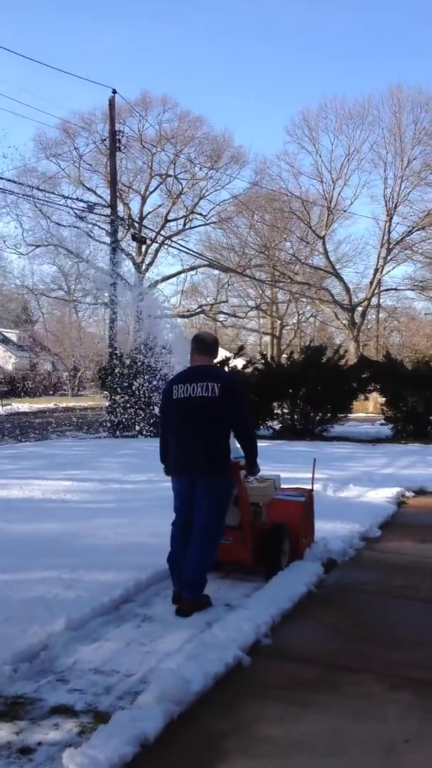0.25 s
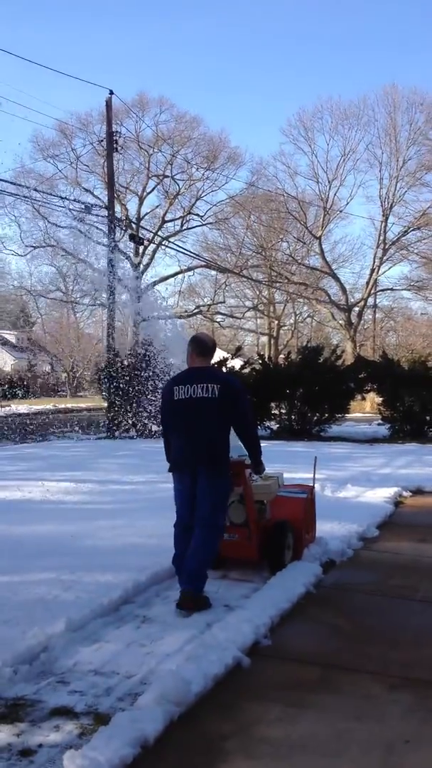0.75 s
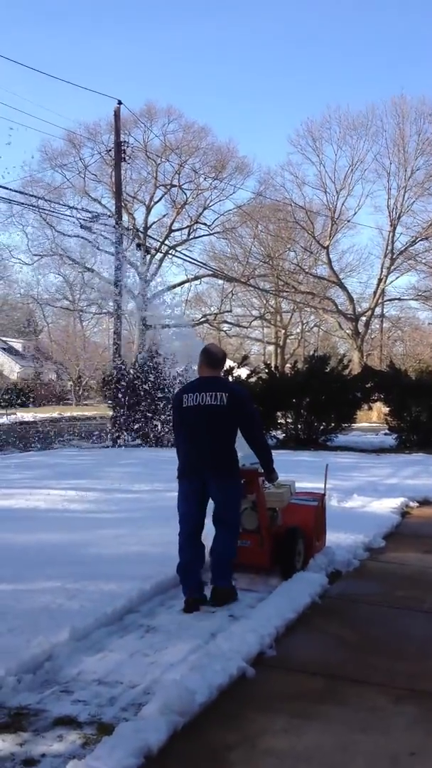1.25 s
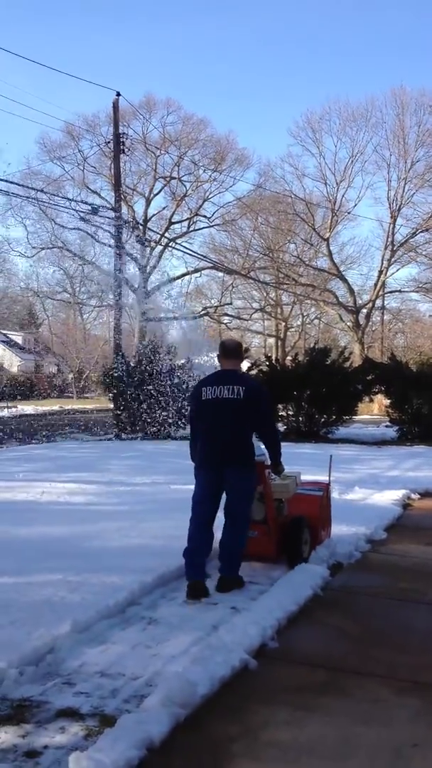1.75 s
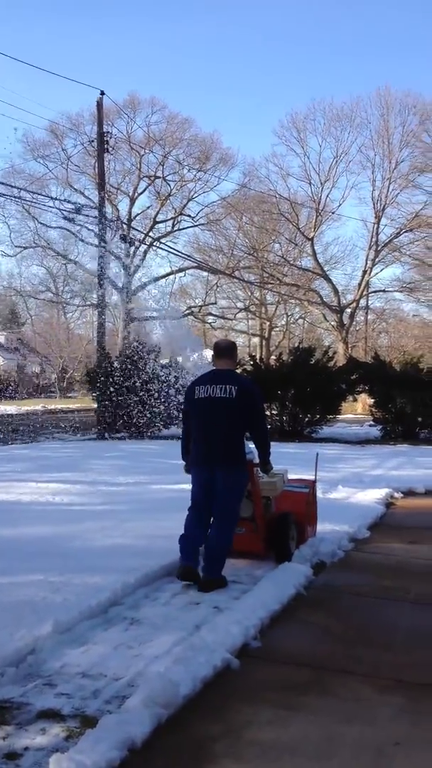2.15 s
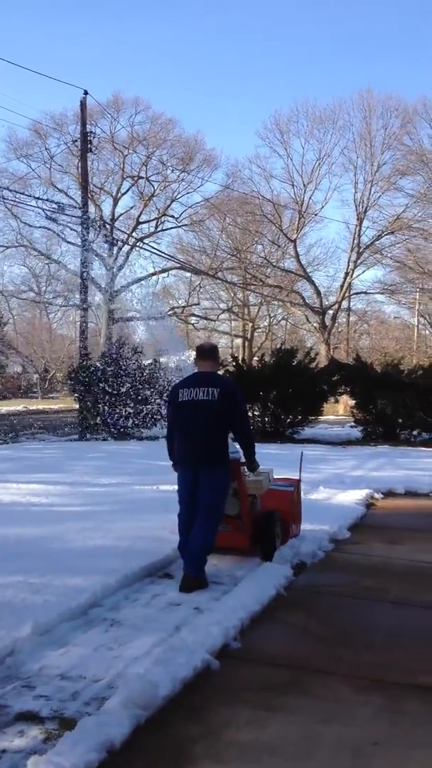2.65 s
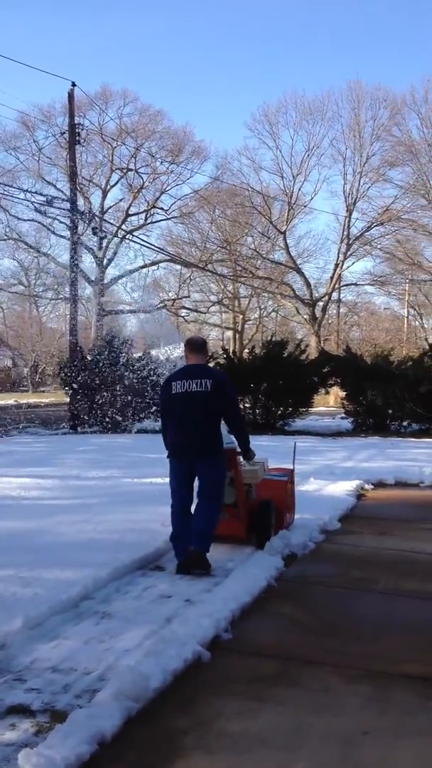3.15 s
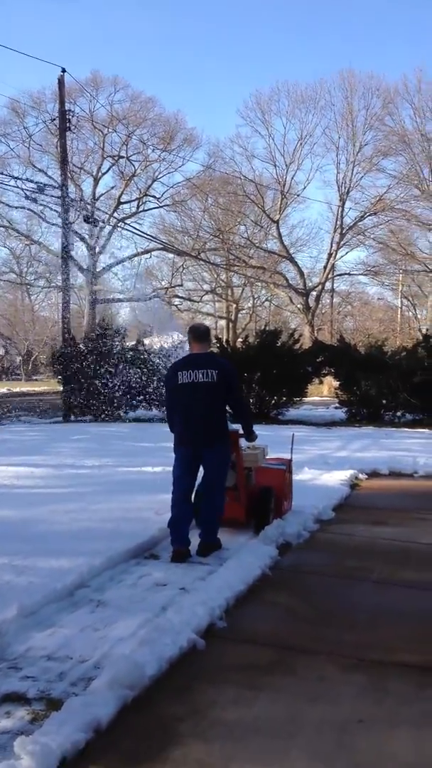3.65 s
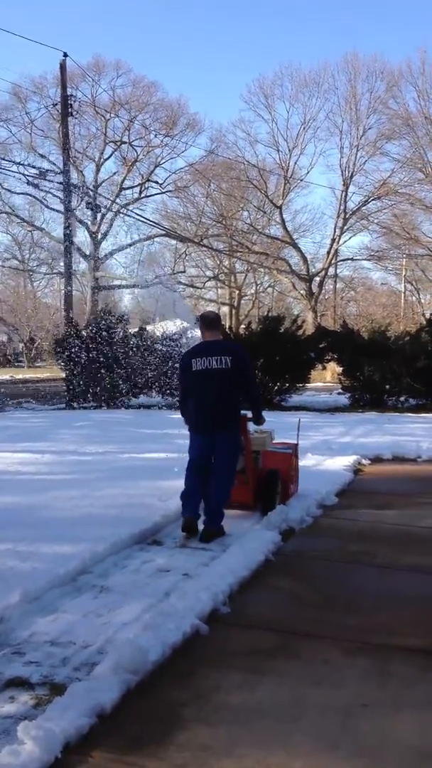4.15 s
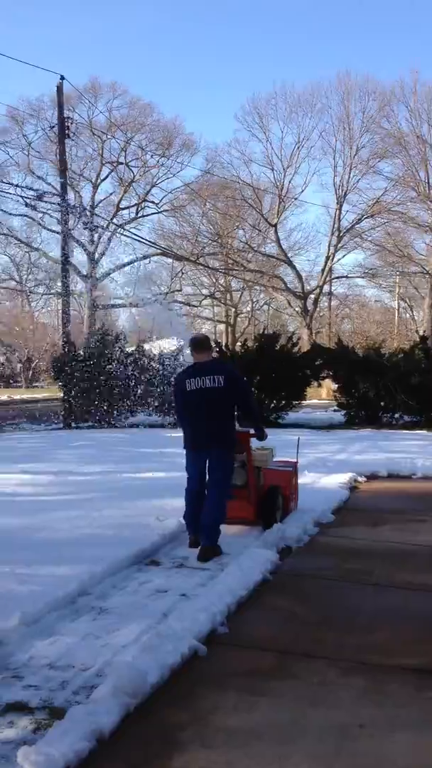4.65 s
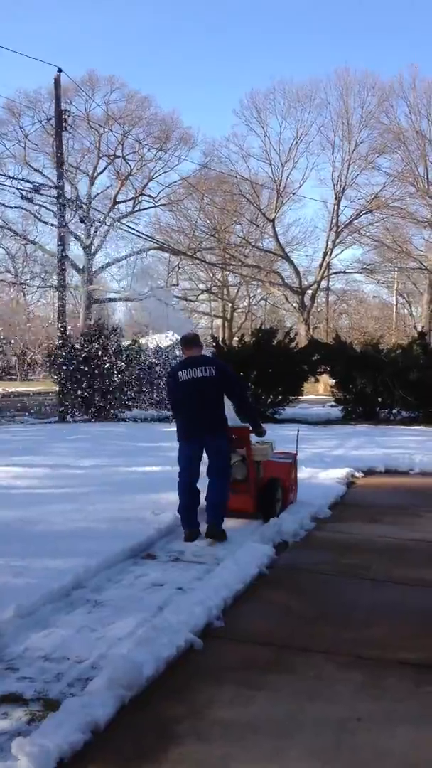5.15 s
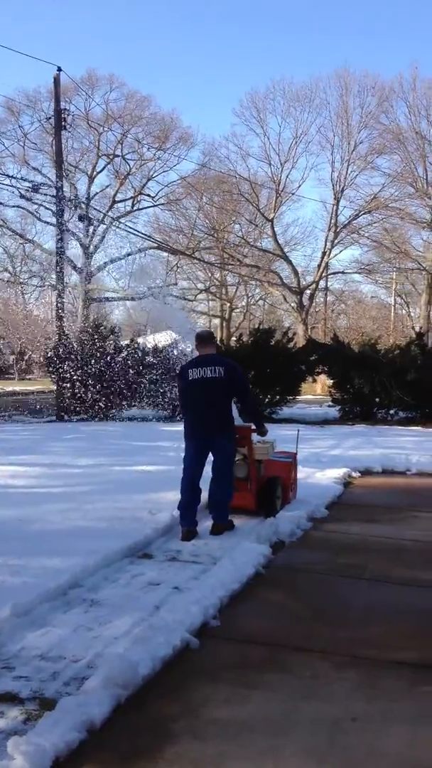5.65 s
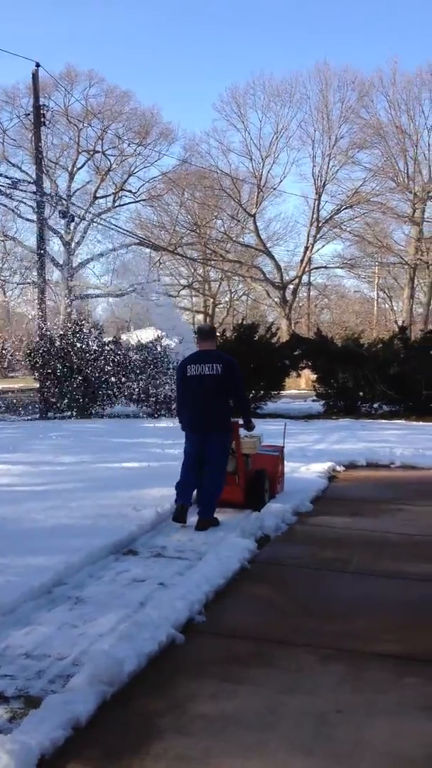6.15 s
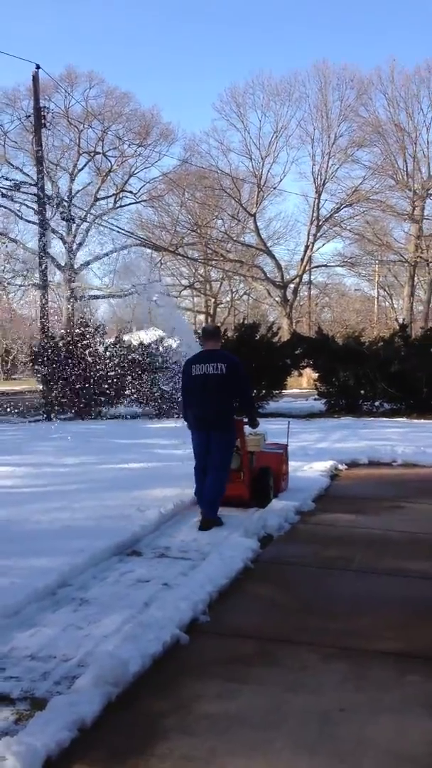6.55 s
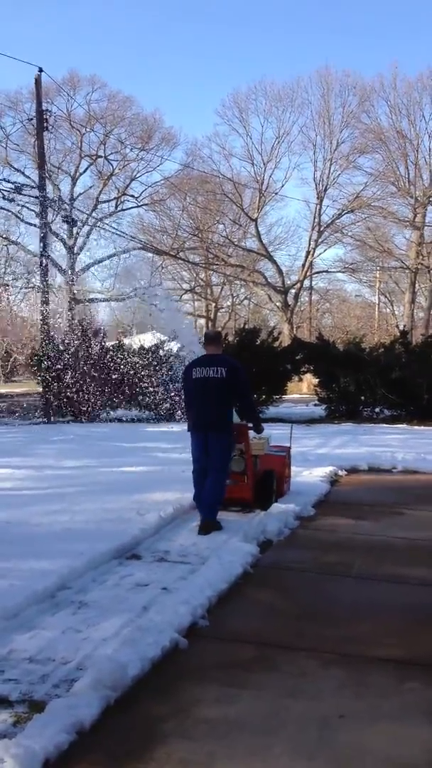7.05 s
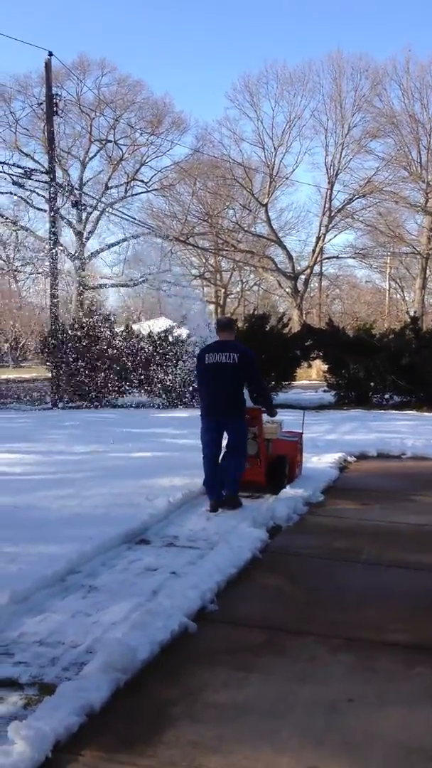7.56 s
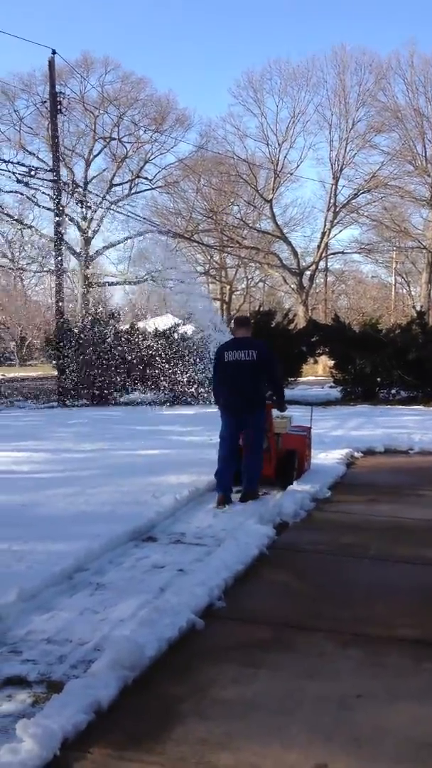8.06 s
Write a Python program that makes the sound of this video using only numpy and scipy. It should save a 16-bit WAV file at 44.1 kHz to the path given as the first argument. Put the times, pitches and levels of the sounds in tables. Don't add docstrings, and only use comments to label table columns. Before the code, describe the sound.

A small single-cylinder snow thrower engine chugs steadily outdoors, clattering and hissing with thrown snow, slowly growing fainter and duller as it moves away.

```python
import sys
import numpy as np
from scipy import signal
from scipy.fft import rfft, irfft
from scipy.io import wavfile
from scipy.ndimage import uniform_filter1d

SR = 44100
rng = np.random.default_rng(int(sys.argv[2]) if len(sys.argv) > 2 else 0)


def transcribe(u):
    v = np.clip(np.atleast_2d(u).T, -1, 1)
    q = np.round(v * 32767).astype(np.int16)
    wavfile.write(sys.argv[1], SR, q)


def makeup_ratio(level_db):
    decades = np.asarray(level_db, float) / 20
    return 10 ** decades


N = 366912
T = np.arange(N) / SR

# [t/s, engine cycles per s]
SPEED = [(0.0, 25.564), (0.34, 24.657), (1.18, 25.161), (1.39, 25.803), (1.55, 25.369), (2.17, 24.814),
         (2.76, 25.9), (3.31, 24.876), (3.78, 25.576), (3.95, 25.128), (4.24, 25.667), (4.93, 24.644),
         (5.51, 25.54), (5.93, 25.048), (6.9, 25.116), (7.11, 25.564), (7.57, 24.91), (8.32, 25.201)]


def evened(x):
    return x / np.sqrt(np.mean(x ** 2) + 1e-20)


def curve(rows, column=1):
    return np.interp(T, [row[0] for row in rows], [row[column] for row in rows])


def read(points, hz):
    f, value = np.transpose(points)
    return np.interp(np.log(hz + 1), np.log(f + 1), value)


def beats(place, spread_db, jitter_ms):
    start_cycle = -.116
    cycles = start_cycle + np.cumsum(curve(SPEED)) / SR
    at = np.flatnonzero(np.diff(np.floor(cycles - place)) > 0)
    chance = rng.standard_normal((len(at), 2))
    late = (chance[:, 0] * jitter_ms * SR / 1000).astype(int)
    clicks = np.zeros(N)
    clicks[np.clip(at + late, 0, N - 1)] = makeup_ratio(spread_db * chance[:, 1])
    return clicks


def noise(gain_db, size, patchy_db):
    hop = size // 4
    frames = N // hop + 5
    hz = np.fft.rfftfreq(size, 1 / SR)[:, None]
    s = np.arange(frames) * hop / SR
    real, imag, patches = rng.standard_normal((frames, len(hz), 3)).T
    patches = uniform_filter1d(patches, size=6, axis=0)
    patches = evened(uniform_filter1d(patches, size=8, axis=1))
    z = (real + 1j * imag) * makeup_ratio(gain_db(hz, s) + patchy_db * patches)
    return signal.istft(z, nperseg=size, noverlap=size - hop)[1][:N]


def level_db(layer):
    # [level at the start/dB, share of spreading loss, share of shade, dB per extra cycle a second]
    layer_rows = [
        (-28.5, 0.24, 0.43, .7),
        (-36, 0.67, 0.45, 0.7),
        (-27, 0.88, 1.1, -0.3),
        (-39.5, 0.99, .9, 0.2),
    ]
    # [t/s, level/dB]
    shade_rows = [(0, 0.5), (.3, -0.6), (.8, 0.55), (1.9, -0.5), (2.7, 0.5), (4.2, -0.3), (5.4, 0.95),
                  (6.3, -0.25), (7.5, -0.1), (8.32, -1)]
    start_m, walk_m_per_s, governed_per_s = 6.37, 0.54, 25.2
    start_db, spread, shade, race_db = layer_rows[layer]
    loss_db = 20 * np.log10(1 + walk_m_per_s * T / start_m)
    racing = curve(SPEED) - governed_per_s
    return start_db - spread * loss_db + shade * curve(shade_rows) + race_db * racing


def exhaust_and_intake():
    # [place in the cycle 0-1, sign, level/dB, ring f/Hz, half length/ms, crest lag/ms]
    puff_rows = [
        (.778, 1, 0, 215, 2.5, .55),
        (.087, -1, -.5, 225, 2.1, 0),
    ]
    # [f/Hz, level/dB]
    puff_colour = [(30, -60), (76, -10), (100, 12), (125, 8), (150, 2.5), (200, 2), (300, -0.5), (380, 9.5),
                   (480, -13)]
    ms = np.arange(-500, 501) * 1000 / SR
    puffs = np.zeros(N)
    for place, sign, db, hz, half_ms, lag_ms in puff_rows:
        swing = np.exp(-.5 * (ms / half_ms) ** 2) * np.cos(2 * np.pi * hz * (ms - lag_ms) / 1000)
        clicks = beats(place, spread_db=1.1, jitter_ms=.12)
        puffs += sign * makeup_ratio(db) * signal.oaconvolve(clicks, swing, "same")
    return irfft(rfft(puffs) * makeup_ratio(read(puff_colour, np.fft.rfftfreq(N, 1 / SR))), N)


def across_yard(puffs):
    # [f/Hz, width/Hz, level near/dB, level far/dB]
    yard_rows = [(138, 25.5, -5.5, 9), (150, 27, 7, -6.5), (257, 4.9, 12, 10), (308, 25, 6.5, -3),
                 (352, 10, 3.5, 6.5), (369, 21, -7, -1.5), (422, 16, -3, 8)]
    for hz, width, near_db, far_db in yard_rows:
        order = signal.filtfilt(*signal.iirpeak(hz, hz / width, SR), puffs)
        puffs = puffs + (makeup_ratio(np.linspace(near_db, far_db, N)) - 1) * order
    return puffs


def thump():
    # [f/Hz, level/dB]
    rumble_colour = [(30, -48), (76, -33), (100, -14), (115, -9), (138, -12), (160, -6), (185, .5),
                     (215, -1), (250, -6), (300, -3), (370, -5), (430, -14), (560, -30)]
    rumble_db = -4.5
    puffs = across_yard(exhaust_and_intake())
    rumble = evened(noise(lambda hz, s: read(rumble_colour, hz) + 0 * s, size=4096, patchy_db=0.0))
    return makeup_ratio(level_db(layer=0)) * evened(evened(puffs) + makeup_ratio(rumble_db) * rumble)


def shell():
    # [place in the cycle 0-1, level/dB]
    blow_rows = [(.675, 0), (.03, -2), (.38, -6)]
    # [f/Hz, t60/s, level near/dB, level far/dB]
    mode_rows = [(660, .08, -3, -6), (760, .05, 0, -5), (828, .11, 2, -1), (905, .11, 0, 3),
                 (1030, .05, 1, -6), (1382, .08, -7, 0)]
    shell_db = -7.5
    t = T[:6000]
    blows = sum(makeup_ratio(db) * beats(place, spread_db=2.0, jitter_ms=0.046) for place, db in blow_rows)
    out = np.zeros(N)
    for hz, t60, near_db, far_db in mode_rows:
        ring = evened(makeup_ratio(-60 * t / t60) * np.sin(2 * np.pi * hz * t))
        out += makeup_ratio(np.linspace(near_db, far_db, N)) * signal.oaconvolve(blows, ring)[:N]
    return makeup_ratio(level_db(layer=1) + shell_db) * evened(out)


def casing_db(hz, s):
    # [f/Hz, level/dB per Hz]
    hiss_colour = [(260, -35), (450, -11), (553, -8.5), (810, -2), (1120, -7), (1380, -5), (1640, -10.5),
                   (2080, -10), (2960, -10), (5730, 0), (10000, -18.5), (13200, -21), (15100, -36.5)]
    # [f/Hz, width/Hz, level near/dB, level midway/dB, level far/dB]
    panel_rows = [(824, 180, 2.5, -1.3, -0.5), (1332, 44, -10, 3.5, 3.5), (1750, 105, 4, -5, 1),
                  (2010, 240, 6, 6.5, 2), (2680, 196, 9.5, 1.5, 5.5), (3340, 64, 5, 2, 0.5),
                  (4260, 104, 3.5, 3, 1), (4970, 79, 2.5, -1.8, 8), (5190, 160, 2.5, 6, -3.5),
                  (5720, 205, 3.5, -0.5, 4.8), (6020, 75, 1.5, 5, -3.5), (10040, 360, -9, -8, -26),
                  (1020, 37, 2, -3, -5.5), (13700, 500, 7, 0, -12)]
    stations_s = np.linspace(0, T[-1], num=3)
    total_db = read(hiss_colour, hz)
    for f, width, *db in panel_rows:
        total_db = total_db + np.interp(s, stations_s, db) * np.exp(-.5 * ((hz - f) / width) ** 2)
    return total_db


def clatter():
    # [place in the cycle 0-1, decay/ms, casing level/dB, hiss level/dB, fizz level/dB]
    tick_rows = [(.08, 3, -1, -3.5, -2), (.36, 4, -2, 2.5, 5), (.68, 1.5, 0, -12, -12),
                 (.735, 3.5, 0, 2, 5)]
    valve_near_db, valve_far_db, valve_hide_s = 3, -1.5, 2
    hz = np.fft.rfftfreq(N, 1 / SR)
    spectrum = rfft(noise(casing_db, size=1024, patchy_db=1.3))
    band = np.searchsorted((3000, 7500), hz)
    bursts = []
    for place, decay_ms, *_ in tick_rows:
        clicks = beats(place, spread_db=2.7, jitter_ms=.4)
        bursts.append(signal.lfilter([1], [1, -np.exp(-1000 / (decay_ms * SR))], clicks))
    valve_db = valve_far_db + (valve_near_db - valve_far_db) * np.exp(-T / valve_hide_s)
    out = np.zeros(N)
    for k in range(3):
        lifts = [makeup_ratio(row[2 + k]) ** 2 * burst for row, burst in zip(tick_rows, bursts)]
        if k > 0:
            lifts[1] = lifts[1] * makeup_ratio(valve_db) ** 2
        swell = np.sqrt(uniform_filter1d(1 + sum(lifts), size=70, origin=30))
        out += makeup_ratio(level_db(1 + k)) * evened(swell * irfft(spectrum * (band == k), N))
    return out


def snap():
    ping_hz, rise_ms, snap_db = 5650, .6, 10
    ms = T[:300] * 1000
    swell = ms / rise_ms * np.exp(1 - ms / rise_ms)
    ping = swell * np.sin(2 * np.pi * ping_hz * ms / 1000)
    hidden_db = 6 * np.maximum(T - .8, 0)
    hits = beats(place=.39, spread_db=2, jitter_ms=.3)
    return makeup_ratio(level_db(layer=2) + snap_db - hidden_db) * signal.oaconvolve(hits, ping)[:N]


def scene():
    return (thump() + shell() + clatter() + snap())[None]


def roll_off(x):
    return signal.sosfilt(signal.butter(12, 15270, fs=SR, output="sos"), x)


def record(dry):
    # [t/s, level/dB]
    survival = [(0, -.5), (.5, 1), (2.5, 1), (3.3, -.5), (6.6, -1), (7.3, 1), (8.32, 1.5)]
    low_hz, high_hz, empty_share = 8500, 15250, .035
    hz, s, z = signal.stft(dry[0], SR, nperseg=1024, noverlap=768)
    power = uniform_filter1d(uniform_filter1d(abs(z) ** 2, size=3, axis=0), size=6, axis=1)
    power = power / uniform_filter1d(power.mean(0), size=60)
    power = power * makeup_ratio(np.interp(s, *np.transpose(survival))) ** 2
    treble = (hz > low_hz) & (hz < high_hz)
    faint = treble[:, None] & (power < np.quantile(power[treble], empty_share))
    empty = uniform_filter1d(uniform_filter1d(faint * 1., size=3, axis=0), size=7, axis=1) > .1
    kept = signal.istft(z * ~empty, SR, nperseg=1024, noverlap=768)[1][None, :N]
    return roll_off(kept)


dry = scene()
out = record(dry)
transcribe(out)
```